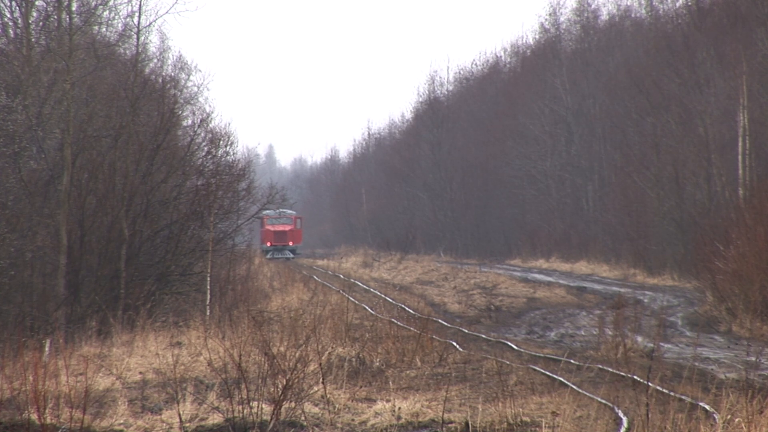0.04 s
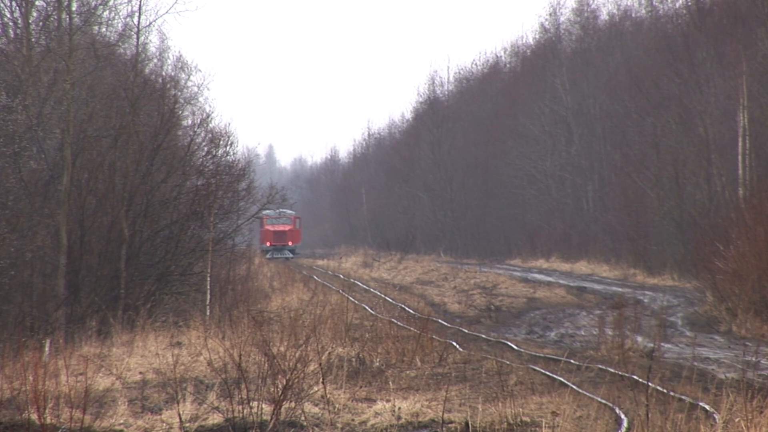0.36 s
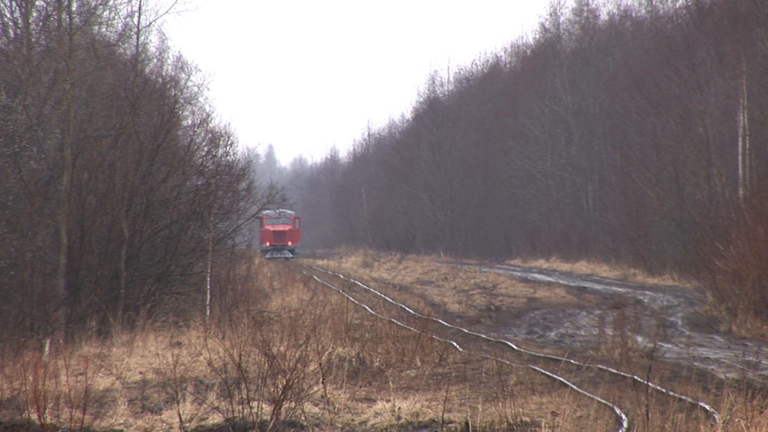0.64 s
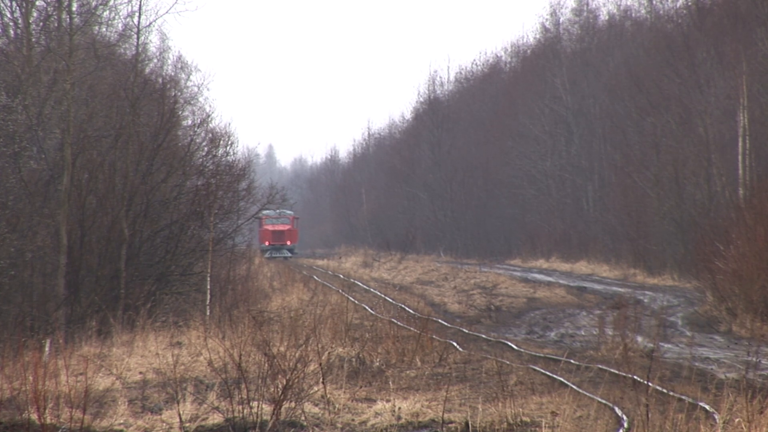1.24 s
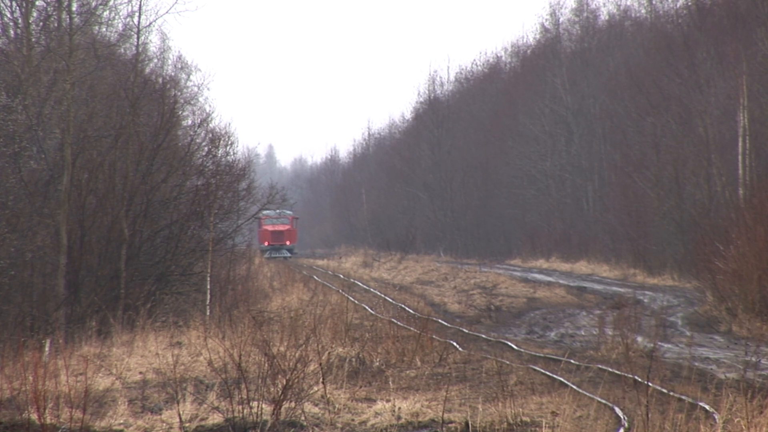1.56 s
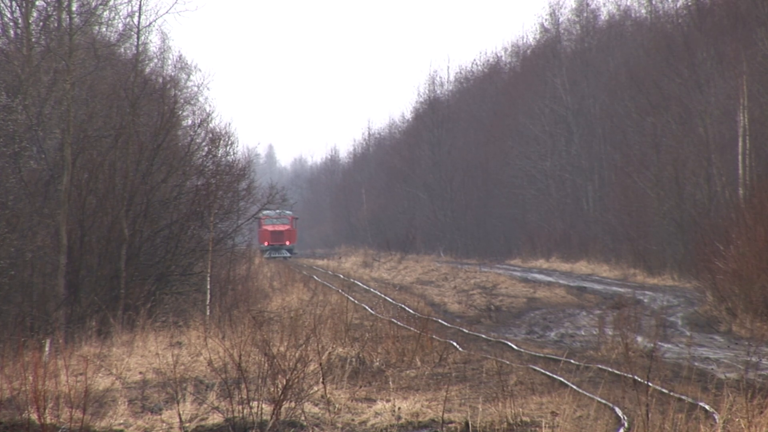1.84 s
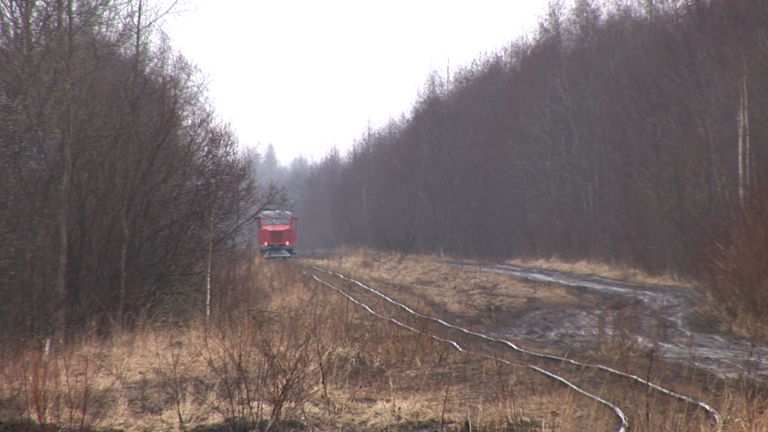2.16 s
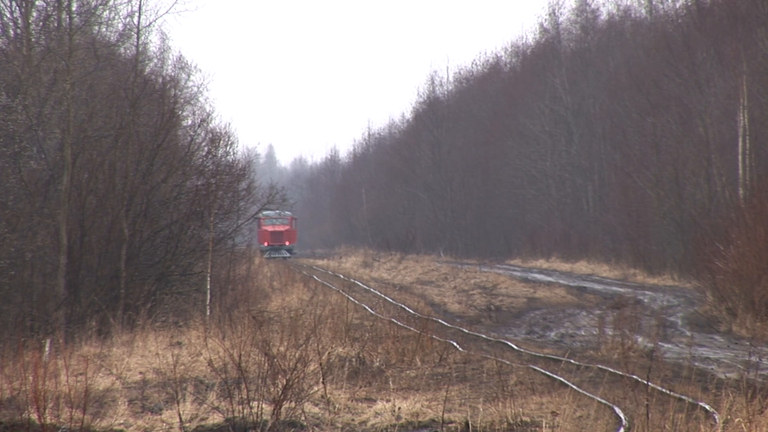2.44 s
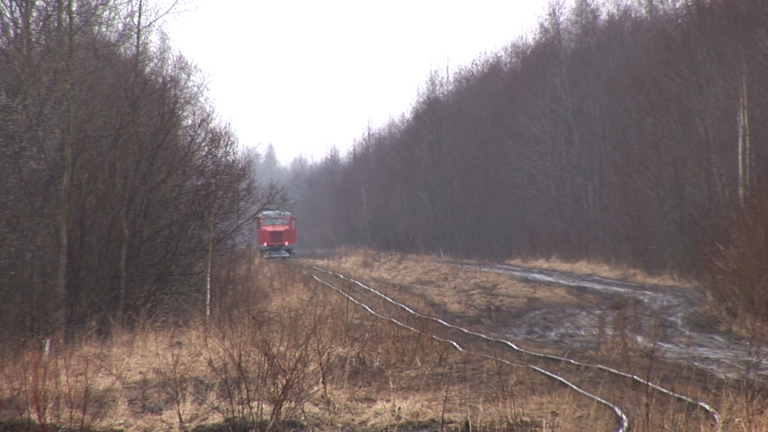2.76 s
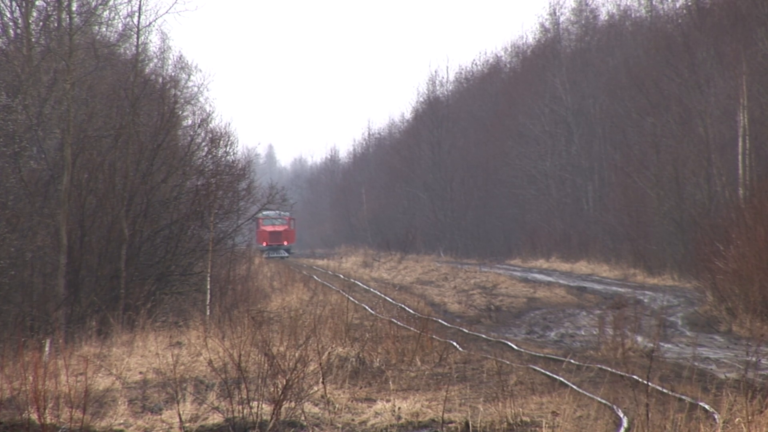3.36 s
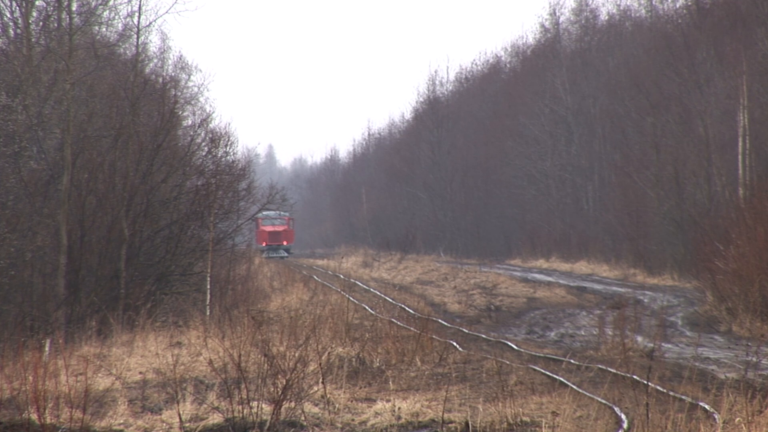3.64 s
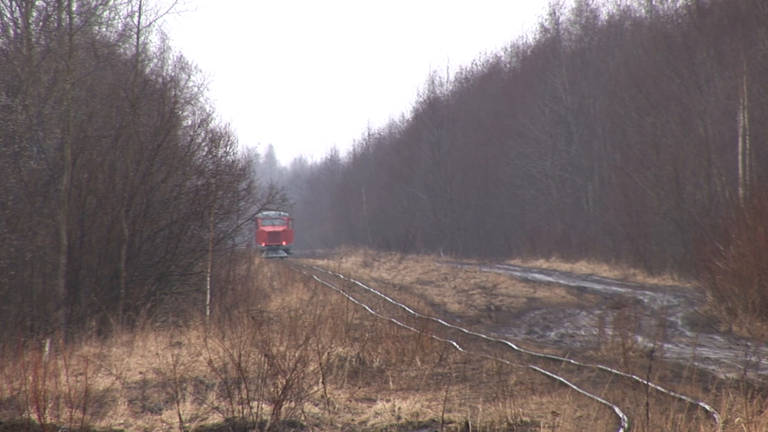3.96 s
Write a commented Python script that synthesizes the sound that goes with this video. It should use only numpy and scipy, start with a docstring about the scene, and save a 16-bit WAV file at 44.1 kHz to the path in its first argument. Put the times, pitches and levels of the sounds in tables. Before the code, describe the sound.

Wind rumbles and thumps unevenly on a microphone in a forest clearing. Underneath, a distant small railcar makes a soft, even rush while dry grass and stalks crackle faintly nearby. Past halfway, something hollow knocks once.

```python
"""From the start, a small railcar creeping along far from a forest clearing sends a soft, even rush.
Gusts buffet the microphone's two openings, the left first and mostly harder; the recorder hisses faintly.
Nearby, dry grass crackles and stalks snap and tick throughout. From about 1.3 s, single swirls of air
thump the microphone. Near 2.7 s something hollow gives one chattering knock, and the gusts blow on."""
import sys
import numpy as np
from scipy.fft import rfft, irfft, next_fast_len
from scipy.io import wavfile
from scipy.ndimage import map_coordinates

SR = 44100
rng = np.random.default_rng(int(sys.argv[2]) if len(sys.argv) > 2 else 0)


def log_audio(samples):
    """Write samples as a 16-bit WAV file to the path given in sys.argv[1]."""
    # one column per channel
    frames = np.atleast_2d(samples).T
    # limit to full scale, then quantise
    limited = np.clip(frames, -1, 1)
    pcm = np.round(limited * 32767).astype(np.int16)
    wavfile.write(sys.argv[1], SR, pcm)


N = 176400  # 4 seconds


def amp(db):
    """Turn decibels into a number to multiply by."""
    return 10 ** (np.asarray(db) / 20)


def unit(x):
    """Scale a signal to an average size (rms) of 1."""
    return x / np.sqrt(np.mean(x ** 2) + 1e-20)


def at_pitch(points, hz):
    """Read between (pitch [Hz], value) points, with octaves evenly spaced."""
    pitches, values = np.transpose(points)
    return np.interp(np.log(hz + 1), np.log(pitches + 1), values)


def over_time(points):
    """Join (time [s], value) points into one value per sample."""
    times, values = np.transpose(points)
    return np.interp(np.arange(N) / SR, times, values)


def wobble(per_s):
    """A smooth curve through per_s random values a second."""
    return map_coordinates(rng.standard_normal(1024), [np.arange(N) * per_s / SR], mode="wrap")


def filtered(x, response):
    """Multiply each pitch in x by response(hz)."""
    size = next_fast_len(N + SR // 2)
    hz = np.fft.rfftfreq(size, 1 / SR)
    return irfft(rfft(x, size) * response(hz), size)[..., :N]


def pan(left_db):
    """Left and right gains, with the left louder by left_db."""
    return amp(np.array([[left_db], [-left_db]]) / 2)


def noise(tone):
    """Noise shaped by (pitch [Hz], level [dB]) points."""
    return unit(filtered(rng.standard_normal(N), lambda hz: amp(at_pitch(tone, hz))))


def stereo_noise(tone, likeness):
    """Shaped noise whose two channels match (likeness 1), are unrelated (0) or are opposite (-1)."""
    def split(hz):
        angle = np.arccos(np.clip(at_pitch(likeness, hz), -1, 1)) / 2
        return amp(at_pitch(tone, hz)) * np.array([np.cos(angle), np.sin(angle)])
    middle, side = filtered(rng.standard_normal((2, N)), split)
    return unit(np.array([middle + side, middle - side]))


def bursts(rows, rise_s):
    """Loudness outline of bursts: (time [s], level [dB], left over right [dB], time to fade 60 dB [s])."""
    t = np.arange(SR // 8) / SR
    power = np.zeros((2, N + SR))
    for start, db, left_db, fade_s in rows:
        shape = amp(-60 * t / fade_s) * (1 - np.exp(-t / rise_s))
        power[:, int(start * SR):][:, :len(t)] += (amp(db) * pan(left_db) * shape) ** 2
    return np.sqrt(power[:, :N])


def scatter(per_s, db, spread_db, fade_s):
    """Rows for bursts at random times: many near db, a few louder."""
    draws = rng.random((1024, 3))[:int(per_s * N / SR)]
    return [(when * N / SR, db - spread_db * np.log(0.12 + size), 2 * (2 * side - 1), fade_s)
            for when, size, side in draws]


# How loud the far rush is: (time [s], level [dB])
RUSH_LEVEL = [(0.0, -59), (0.28, -61), (0.5, -59), (0.8, -62), (2.35, -61.5), (2.99, -62), (3.42, -61),
              (4.0, -61)]
# Its tone in the middle, at the sides and in one narrow ringing band: (pitch [Hz], level [dB])
RUSH_MIDDLE_TONE = [(40, -6.5), (200, 3), (450, 3.5), (750, -6.5), (1250, 2.5), (1600, -4.5), (2450, -5),
                    (3100, -6), (3500, -7.5), (4400, -17.5), (4900, -13), (5350, -22.5), (5750, -15),
                    (6300, -38), (9000, -47)]
RUSH_SIDE_TONE = [(40, 4), (400, -5.5), (800, -4), (1300, -8.5), (2100, -13.5), (3000, -21), (3900, -18),
                  (4900, -15.5), (5600, -20.5), (6300, -16), (7000, -29), (9000, -22), (12000, -62)]
RUSH_RING_TONE = [(2400, -46), (2680, -3), (2780, -6), (2950, -2.5), (3300, -29)]

def far_rush():
    """The distant railcar and the trees blend into one wavering rush; a narrow band swells on its own."""
    ring = amp(-13 + 4 * wobble(per_s=12)) * noise(RUSH_RING_TONE)
    middle = noise(RUSH_MIDDLE_TONE) + ring
    side = amp(-2.5) * noise(RUSH_SIDE_TONE)
    level_db = over_time(RUSH_LEVEL) + 1 + 0.5 * wobble(per_s=25.1)
    return amp(level_db) * np.array([middle + side, middle - side])


# How far ahead the air's swing is at the left opening: (pitch [Hz], head start [radians])
LEFT_HEAD_START = [(40, 0.19), (130, 1.12), (300, 2.26), (600, 3.38)]

def swirling_air(tone, lumpy_db, lumps_per_s):
    """Uneven air sweeps across the microphone's left opening and then its right."""
    air = stereo_noise(tone, likeness=[(1, 0.54)])  # equally alike at every pitch
    air = filtered(air, lambda hz: np.exp(1j * at_pitch(LEFT_HEAD_START, hz) * np.array([[.5], [-.5]])))
    shared_lumps = wobble(lumps_per_s)
    own_lumps = np.array([wobble(lumps_per_s), wobble(lumps_per_s)])
    return unit(air * amp(lumpy_db * (shared_lumps + own_lumps)))


# Strength of the wind's deep rumble and of the flutter above it: (time [s], level [dB])
RUMBLE_LEVEL = [(0, -55), (.13, -55), (.21, -46.5), (.33, -55), (.42, -44), (.5, -45.5), (.65, -46),
                (.7, -46.5), (.76, -41.5), (.88, -46.5), (.96, -38), (.99, -46), (1.04, -41.5),
                (1.12, -43.5), (1.16, -50), (1.23, -40.5), (1.29, -42.5), (1.36, -44.5), (1.51, -45),
                (1.58, -40.5), (1.77, -45), (1.83, -39.5), (1.93, -42.5), (2.15, -37.5), (2.19, -47),
                (2.22, -38.5), (2.35, -41.5), (2.47, -37.5), (2.54, -47.5), (2.61, -37), (2.66, -47.5),
                (2.82, -40), (2.92, -46), (3.04, -37.5), (3.1, -45), (3.14, -38), (3.2, -48.5), (3.28, -37),
                (3.36, -58.5), (3.46, -42.5), (3.52, -34), (3.56, -42), (3.61, -40.5), (3.74, -46.5),
                (3.83, -47), (3.87, -36.5), (4, -44)]
FLUTTER_LEVEL = [(0.0, -70.5), (0.3, -64.5), (0.42, -54.5), (0.65, -62.5), (0.73, -51.5), (0.97, -60),
                 (1.17, -58.5), (1.32, -51), (1.45, -58.5), (1.78, -61.5), (1.82, -44.5), (1.92, -59),
                 (2.06, -48.5), (2.1, -55), (2.14, -44), (2.19, -55), (2.29, -49.5), (2.33, -60),
                 (2.36, -50.5), (2.41, -55), (2.455, -41), (2.5, -51.5), (2.62, -56), (2.65, -59),
                 (2.81, -52), (2.92, -61.5), (3.02, -50.5), (3.11, -51.5), (3.15, -43), (3.19, -59.5),
                 (3.36, -68), (3.47, -61.5), (3.52, -48), (3.56, -56), (3.59, -59), (3.73, -70),
                 (3.86, -54), (4.0, -58.5)]
# Which way the rumble leans: (time [s], left over right [dB])
RUMBLE_LEAN = [(0, -1.5), (.8, 2.5), (.91, -8), (.98, 1), (1.4, 2.5), (1.77, -2), (2.06, 4), (2.25, -5),
               (2.45, 6), (3.14, 2), (3.7, 5.5), (4, 4.5)]
# Tone of the rumble and of the flutter: (pitch [Hz], level [dB])
RUMBLE_TONE = [(15, -11), (26, -6.5), (44, -0.5), (70, -2.5), (100, -7), (160, -12), (250, -23.5),
               (400, -34), (800, -71.5)]
FLUTTER_TONE = [(70, -19), (130, -2.5), (190, 2.5), (260, -2), (340, -5), (420, -14), (600, -17),
                (900, -30), (2000, -60), (6000, -81)]

def wind():
    """Wind on the microphone makes a deep rumble, with a higher flutter in the harder gusts."""
    rumble_gain = amp(over_time(RUMBLE_LEVEL) + 1.5) * pan(over_time(RUMBLE_LEAN))[:, 0]
    flutter_gain = amp(over_time(FLUTTER_LEVEL) + 4) * pan(left_db=5.5)
    rumble = rumble_gain * swirling_air(RUMBLE_TONE, lumpy_db=1.07, lumps_per_s=20)
    flutter = flutter_gain * swirling_air(FLUTTER_TONE, lumpy_db=1.9, lumps_per_s=40)
    return rumble + flutter


# Tone of the recorder's hiss: (pitch [Hz], level [dB])
HISS_TONE = [(3000, -6), (7000, -10.5), (9500, -8), (10500, -4.5), (14100, -3), (15000, -23), (15700, -4.5)]

def hiss():
    """The recorder makes a faint, steady noise of its own."""
    return amp(-70.5) * stereo_noise(HISS_TONE, likeness=[(8000, -0.08), (10500, 0.32), (15000, -0.086)])


# How alike left and right are for close sounds: (pitch [Hz], likeness [-1 to 1])
NEAR_LIKENESS = [(700, -0.77), (1200, 0.85), (2200, 0.56), (3000, 1), (4000, -0.32), (6200, -0.89),
                 (10000, 0.2)]

def near_bursts(rows, tone, rise_s):
    """Short puffs of noise close to the microphone that rise fast and die away."""
    return bursts(rows, rise_s) * stereo_noise(tone, NEAR_LIKENESS)


# How loud the grass is: (time [s], level [dB])
GRASS_LEVEL = [(0, -67.5), (1.3, -67), (1.7, -68), (2.5, -70.5), (3.3, -68.5), (4, -66)]
# Thin, high tone of the grass and of ticking stalks: (pitch [Hz], level [dB])
THIN_TONE = [(3000, -37), (7000, -15), (11000, 0.5), (14000, 6.5), (16000, -3.5)]

def grass_crackle():
    """Dry grass crackles finely, in clumps."""
    grains = scatter(per_s=240, db=0, spread_db=4.0, fade_s=0.01)
    level_db = over_time(GRASS_LEVEL) + 0.9 * wobble(per_s=7.9)
    return amp(level_db) * near_bursts(grains, THIN_TONE, rise_s=0.00023)


# Snapping stalks: (time [s], crack level [dB], body level [dB], left over right [dB], fade time [s])
STALK_SNAPS = [(0.05, -55, -46.5, -7, 0.053), (.075, -51.5, -64, 0.5, 0.084), (.166, -52, -59, 0, 0.062),
               (.197, -52, -52, 0, 0.13), (0.235, -49, -53, 2, 0.07), (0.318, -53, -50, -2, 0.11),
               (.379, -50.5, -63, 0, 0.052), (0.439, -63, -52, -10, .06), (1, -51.5, -71, 2, 0.085),
               (1.022, -63, -49.5, -2, 0.033), (1.081, -55, -52, 0, 0.046), (1.167, -60, -49.5, -6, 0.041),
               (1.552, -70, -47.5, -3, 0.08), (1.763, -69, -45, -1, 0.042), (2.006, -50, -61, 2, 0.078),
               (2.222, -53.5, -58, 9, 0.046), (2.706, -48.5, -60, 4, 0.043),
               (2.9296, -43.5, -41, -2, 0.013), (3.071, -52, -52, 0, 0.028), (3.147, -52, -64, 3, 0.07),
               (3.225, -41.5, -50, 0, .025), (3.232, -52, -61, -1, 0.081), (3.327, -49.5, -54, 0, 0.058),
               (3.516, -51.5, -52.5, 8, 0.096), (3.604, -50, -49, 2.5, 0.068),
               (3.816, -50.5, -66, 0, 0.082)]
# Tone of a snap's bright crack and of its woody body: (pitch [Hz], level [dB])
CRACK_TONE = [(600, -10), (1500, -2.5), (2400, 1), (2850, 3), (3400, -1.5), (4200, -4.5), (5700, -7),
              (7000, -21), (10000, -21.5), (14000, -16.5)]
BODY_TONE = [(300, -13), (520, -2.5), (1000, -0.5), (1250, -1), (1700, -4), (2600, -13), (5000, -58)]

def stalk_snaps():
    """Dry stalks snap, each with a bright crack and a woody body; many soft random ones make a rustle."""
    cracks = [(start, db, left_db, fade_s) for start, db, _, left_db, fade_s in STALK_SNAPS]
    cracks += scatter(per_s=60, db=-60.5, spread_db=1.5, fade_s=0.058)
    bodies = [(start, db, left_db, fade_s) for start, _, db, left_db, fade_s in STALK_SNAPS]
    bodies += scatter(per_s=30, db=-58, spread_db=1.5, fade_s=0.072)
    return near_bursts(cracks, CRACK_TONE, rise_s=0.0011) + near_bursts(bodies, BODY_TONE, rise_s=0.0016)


# Ticking stalks: (time [s], level [dB])
STALK_TICKS = [(.22, -56), (.323, -54), (.379, -61), (.464, -52), (.6285, -61), (1.16, -50), (1.272, -52),
               (1.372, -45.5), (1.378, -46.5), (2.005, -55), (2.04, -55), (2.247, -56), (3.4755, -53),
               (3.654, -46)]

def stalk_ticks(fade_s=0.012):
    """Dry stalks give thin, high, very short ticks."""
    ticks = [(start, db, 0, fade_s) for start, db in STALK_TICKS]
    return near_bursts(ticks, THIN_TONE, rise_s=0.00061)


# Single swirls of air: (time [s], peak level [dB], pitch [Hz], left over right [dB])
AIR_THUMPS = [(1.281, -31, 88, 2), (1.33, -39.5, 280, 3), (1.826, -32.5, 121, 9), (1.877, -31, 47, -2),
              (2.06, -30.5, 105, 9), (2.091, -33.5, 137, 10), (2.138, -29, 116, 1), (2.291, -31.5, 38, -7),
              (2.466, -35, 140, 1), (2.608, -29.5, 65, 3), (3.141, -32, 76, 0)]

def air_thumps(width_s=0.0093):
    """A swirl of air hits the microphone: the pressure swings once or twice and is gone."""
    out = np.zeros((2, N))
    for peak_s, db, hz, left_db in AIR_THUMPS:
        t = np.arange(N) / SR - peak_s
        swell = np.exp(-np.abs(t / width_s) ** 1.5)
        head_start = at_pitch(LEFT_HEAD_START, hz) * np.array([[.5], [-.5]])
        swing = np.cos(2 * np.pi * hz * t + rng.uniform(0, 2 * np.pi) + head_start)
        out += amp(db) * pan(left_db) * swell * swing
    return out


# The knock and its bounces: (time [s], level [dB])
KNOCK_HITS = [(2.6684, -35.5), (2.6724, -41.5), (2.6824, -45), (2.689, -41.5)]
# The notes the hollow object rings with: (pitch [Hz], level [dB], fade time [s])
KNOCK_NOTES = [(411, -1, 0.046), (630, -4.5, 0.032), (850, -2, 0.036), (1067, 0.5, 0.034), (1295, -6, 0.05),
               (1650, -12, 0.041), (2400, -3.5, 0.022), (2690, -5, 0.04), (3060, -19, 0.033)]

def hollow_knock(crack_fade_s=0.02):
    """A small hollow object to the right is struck and chatters; each hit cracks and rings briefly."""
    t = np.arange(SR // 4) / SR
    ring = np.zeros(N + SR)
    for start, hit_db in KNOCK_HITS:
        for hz, note_db, fade_s in KNOCK_NOTES:
            strength = amp(hit_db + note_db - 9.5 + rng.normal(0, 1.4))
            note = amp(-60 * t / fade_s) * np.sin(2 * np.pi * hz * t)
            ring[int(start * SR):][:len(t)] += strength * note * rng.choice([-1, 1])
    cracks = [(start, hit_db - 12.5, 0, crack_fade_s) for start, hit_db in KNOCK_HITS]
    return pan(left_db=-6.5) * (ring[:N] + near_bursts(cracks, CRACK_TONE, rise_s=0.0003))


def scene():
    """Everything that reaches the microphone."""
    air = wind() + air_thumps()
    return air + far_rush() + stalk_snaps() + stalk_ticks() + grass_crackle() + hollow_knock()


def record(dry):
    """The recorder adds its hiss and keeps nothing above 15700 Hz."""
    return filtered(dry + hiss(), lambda hz: hz < 15700)


dry = scene()
out = record(dry)
log_audio(out)
```